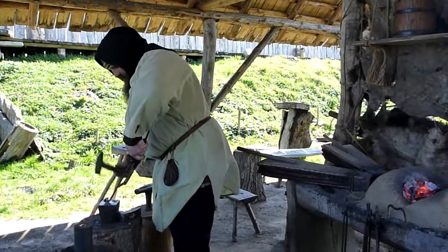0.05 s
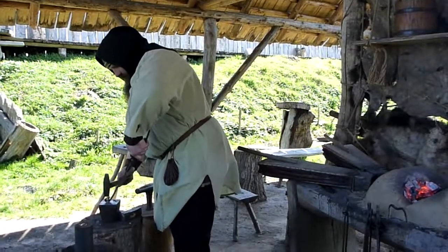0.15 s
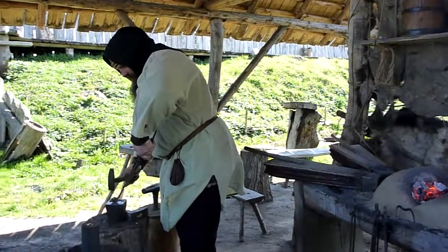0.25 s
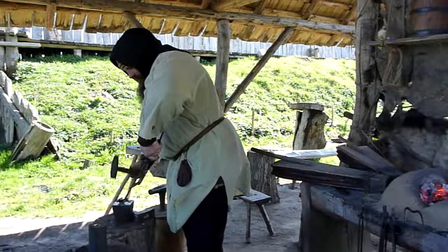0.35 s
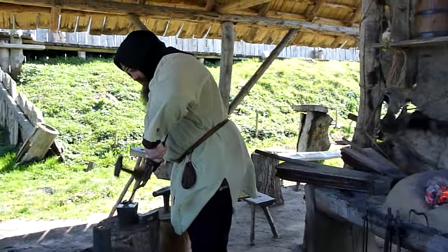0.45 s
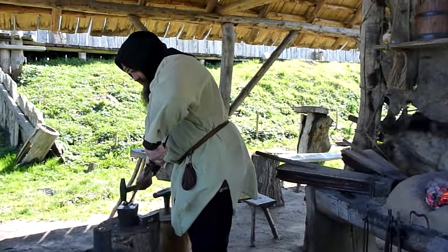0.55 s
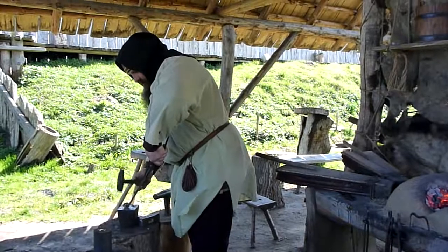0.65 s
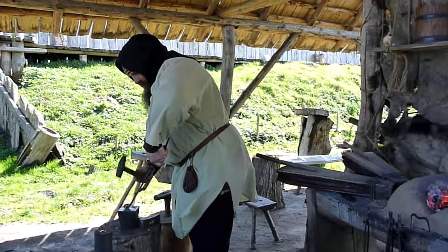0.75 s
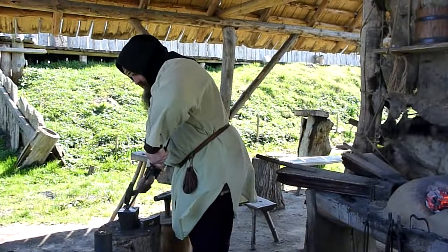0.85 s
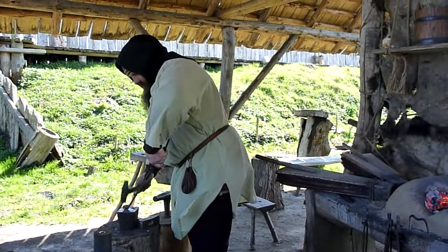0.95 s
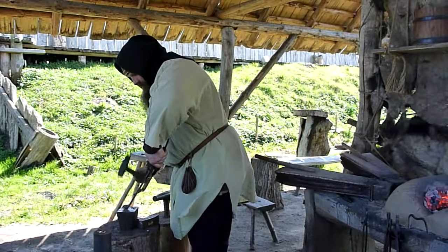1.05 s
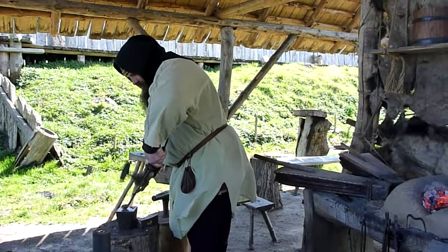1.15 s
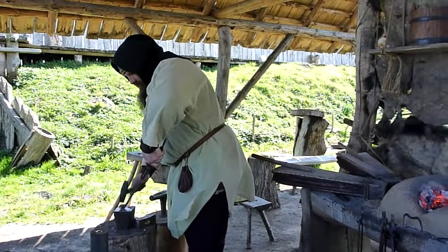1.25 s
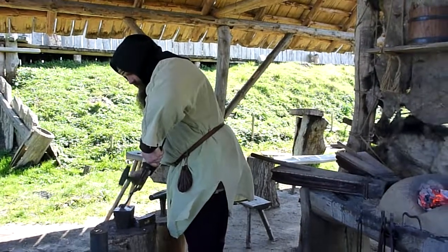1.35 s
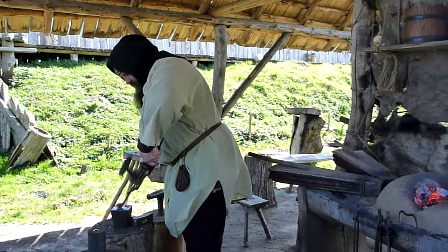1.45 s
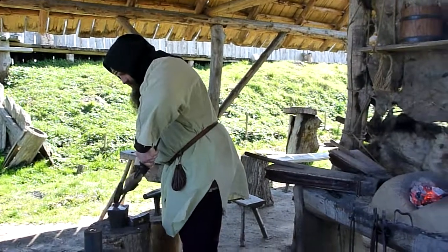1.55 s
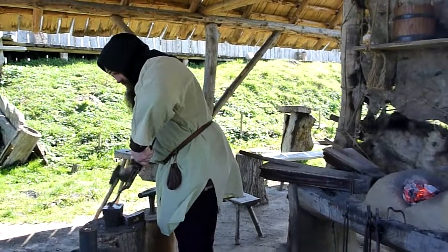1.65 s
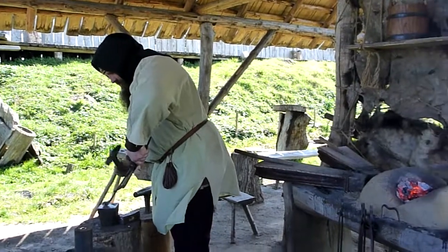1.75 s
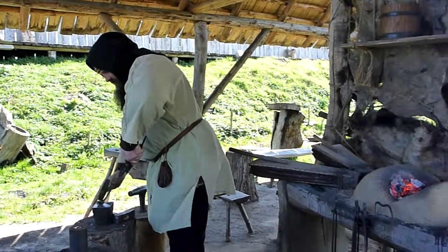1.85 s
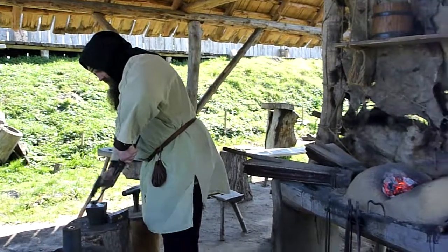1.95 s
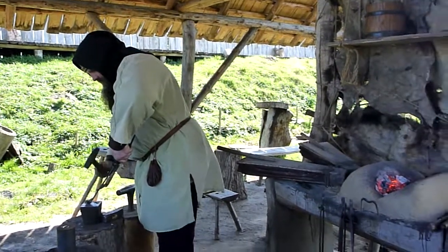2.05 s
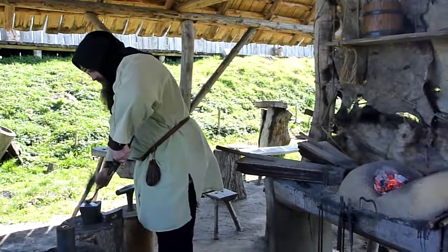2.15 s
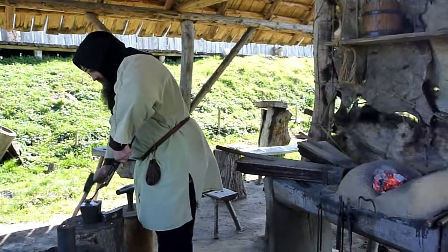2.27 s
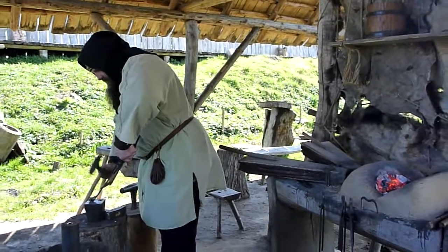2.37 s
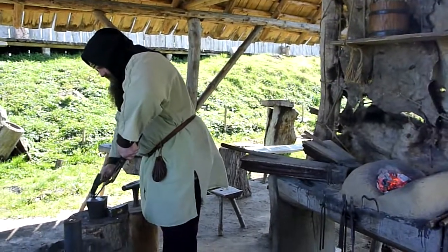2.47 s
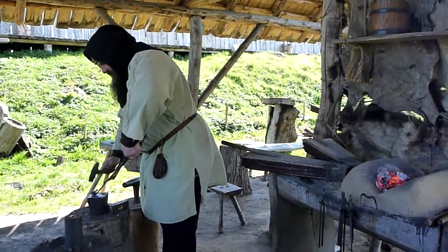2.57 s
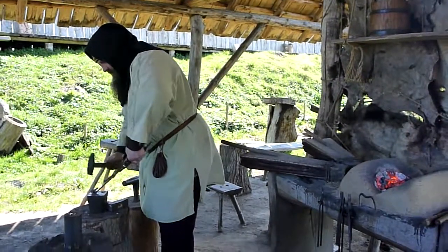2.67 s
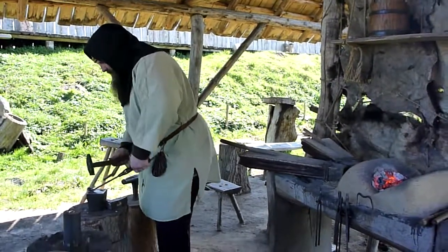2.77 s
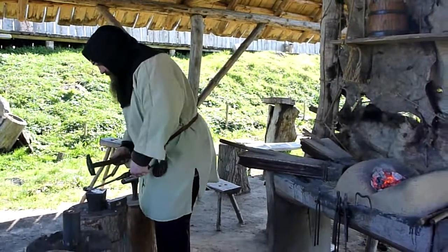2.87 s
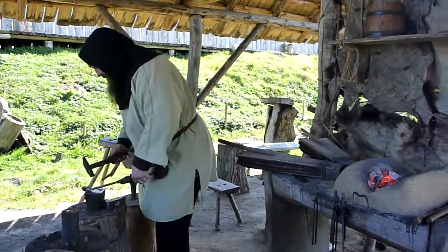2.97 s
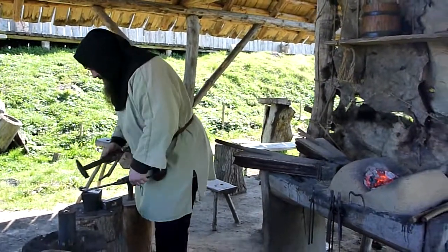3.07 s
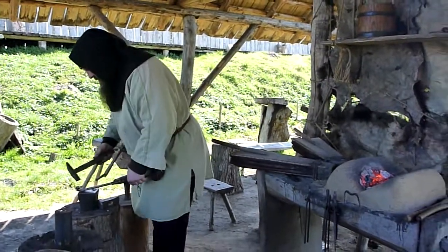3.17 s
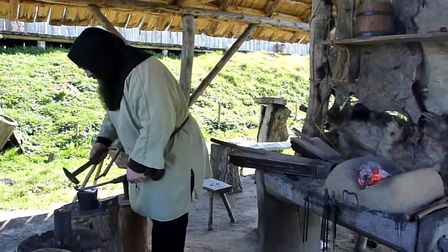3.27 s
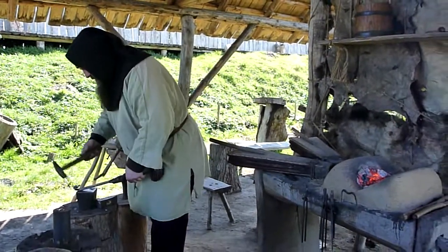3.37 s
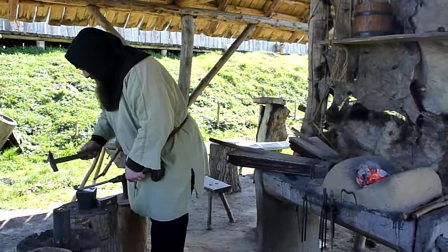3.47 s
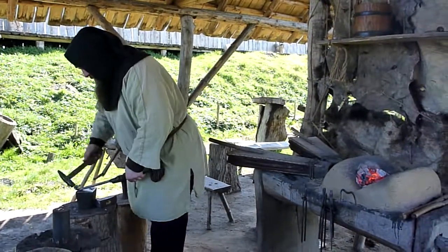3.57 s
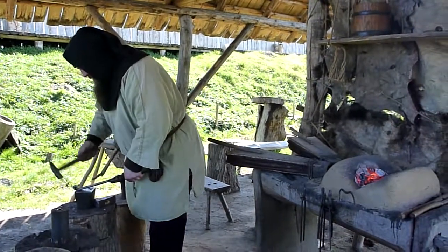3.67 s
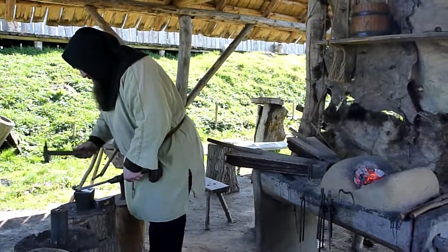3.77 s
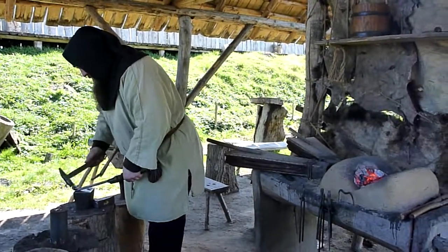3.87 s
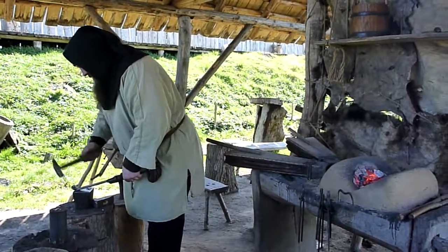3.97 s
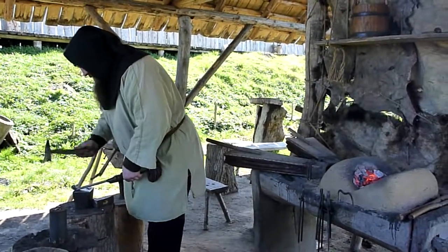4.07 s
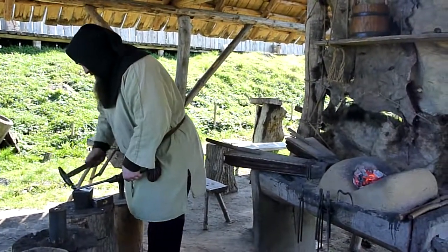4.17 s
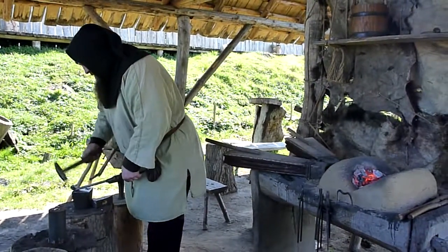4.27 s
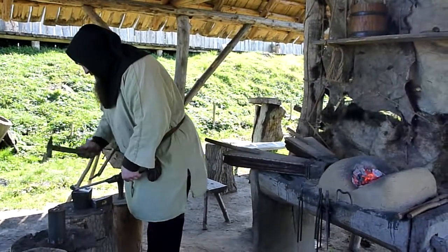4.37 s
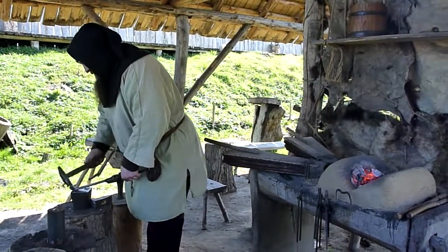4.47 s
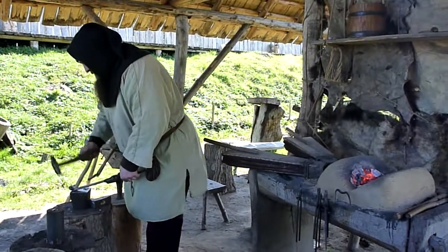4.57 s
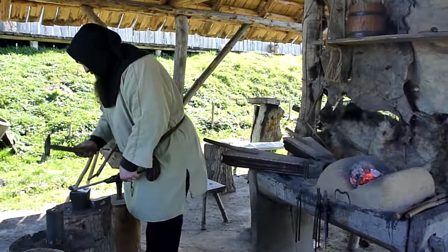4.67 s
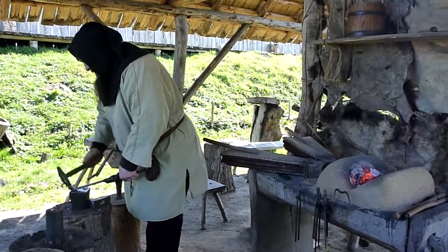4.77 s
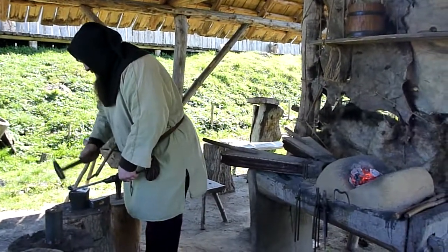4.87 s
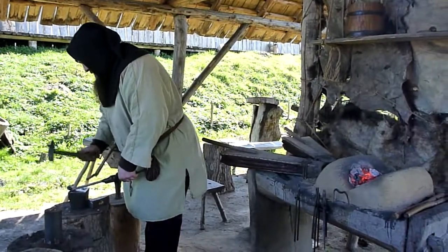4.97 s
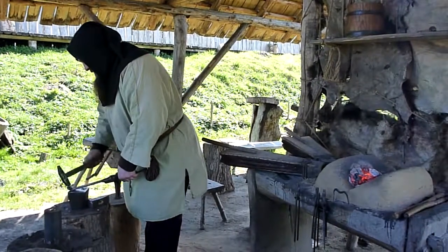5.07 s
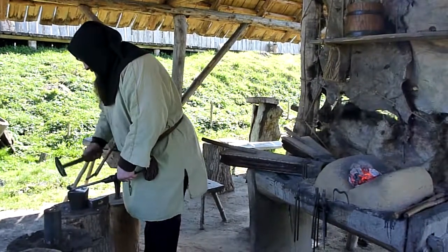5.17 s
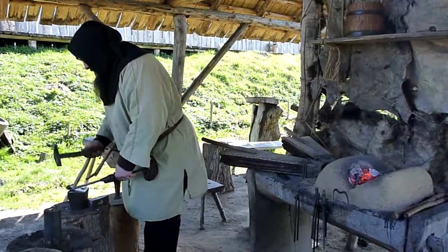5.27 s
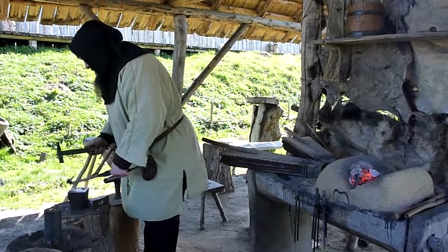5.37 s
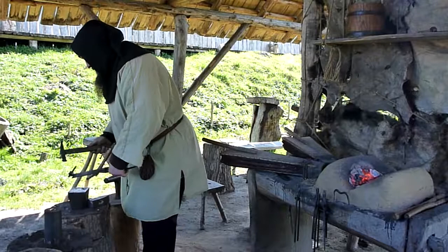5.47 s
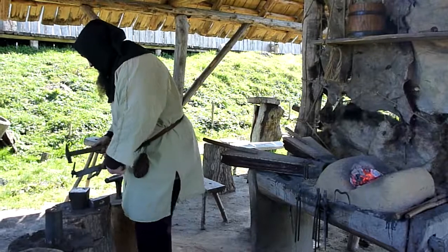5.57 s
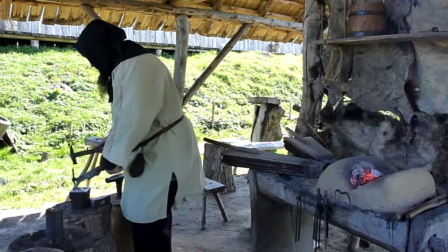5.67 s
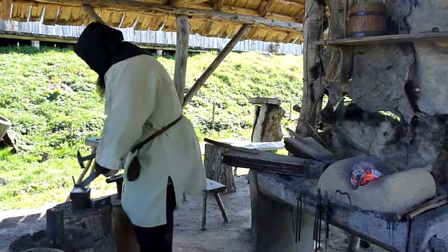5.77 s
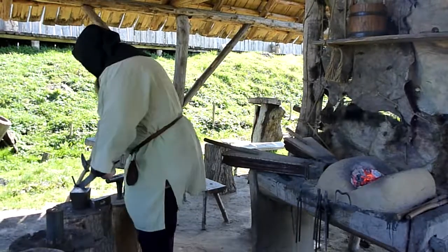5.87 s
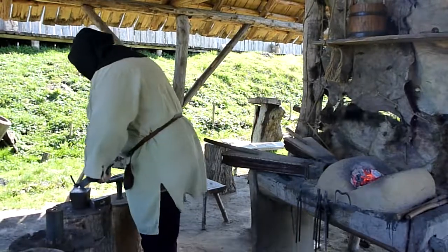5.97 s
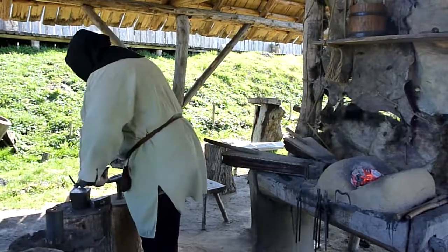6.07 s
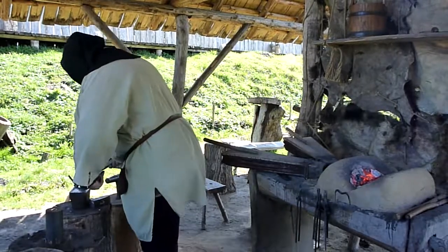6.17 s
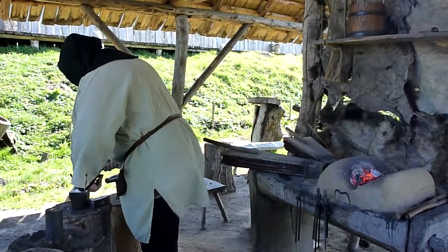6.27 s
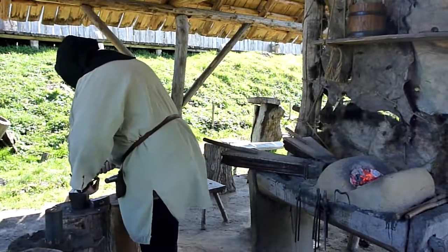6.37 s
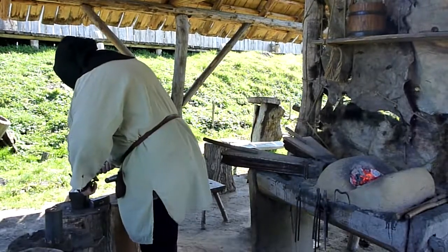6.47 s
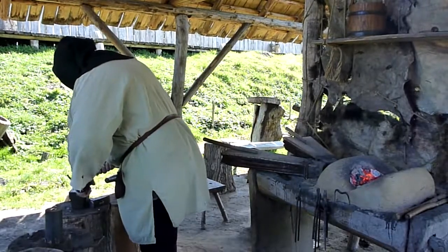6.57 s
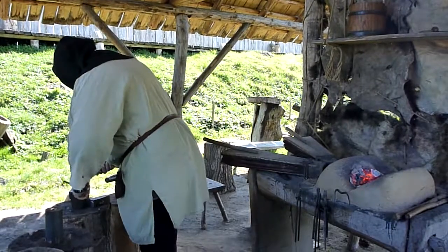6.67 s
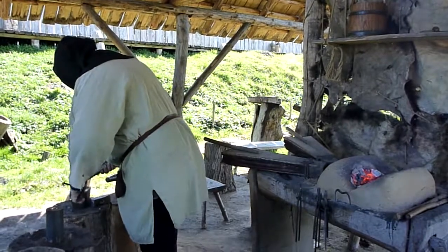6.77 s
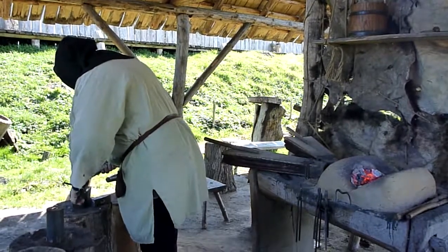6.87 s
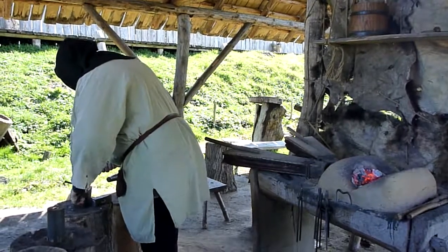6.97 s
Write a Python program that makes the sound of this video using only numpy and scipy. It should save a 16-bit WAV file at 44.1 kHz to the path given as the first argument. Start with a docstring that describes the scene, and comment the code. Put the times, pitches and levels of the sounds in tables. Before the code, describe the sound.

In an open thatched forge, a smith hammers soft iron: eight steady clanks, the first ringing slightly through the tongs, with loud dry snaps close to the microphone. He pauses, feet and clothes shifting softly, then gives six more quick blows with a tiny hammer bounce after the first. A faint tap and light rubbing follow, leaving quiet open air in mono.

```python
"""Forging on a small anvil

A smith forges hot iron on a small anvil set in a wooden stump, under an open thatched roof.
Soft iron damps each blow: noise bands decay as a short bright clack, damped modes ring as stump, anvil and tongs.
He pauses to turn the work, shifts his feet and lays the hammer down; shaped noise makes the feet, clothes and rubbing.
Dry snaps sound close by, as noise bursts with a faint ring. Filtered noise forms the outdoor air and a high squeal."""
import sys
import numpy as np
from scipy import signal
from scipy.fft import rfft, irfft
from scipy.io import wavfile

SR = 44100
rng = np.random.default_rng(int(sys.argv[2]) if len(sys.argv) > 2 else 0)


def log_audio(samples):
    """Write samples as a 16-bit WAV file to the path given in sys.argv[1]."""
    # one column per channel
    frames = np.atleast_2d(samples).T
    # limit to full scale, then quantise
    limited = np.clip(frames, -1, 1)
    pcm = np.round(limited * 32767).astype(np.int16)
    wavfile.write(sys.argv[1], SR, pcm)


N = 309994

# All levels are relative to the later gains of their own source, unless noted.
# Outdoor air: (frequency [Hz], spectral density [dB per Hz])
AIR_SPECTRUM = [(15, -54), (25, -28.5), (64, -15), (166, -5), (206, -2.5), (416, 0), (677, 1.5),
                (1040, -1.5), (1160, -2), (4140, -10.5), (5570, -12.5), (6740, -15), (7920, -16),
                (9840, -19), (16000, -34.5)]
# Slow course of the air: (time [s], level [dB])
AIR_LEVEL = [(0.0, -53), (0.19, -52.5), (0.58, -57), (2.94, -59), (3.37, -57), (4.93, -58.5), (5.19, -60),
             (7.03, -55.5)]
# Partials of a faint squeal that comes and goes once: (frequency [Hz], level at its height [dB])
SQUEAL_PARTIALS = [(4950, -65.5), (5800, -74), (6850, -68), (7550, -67), (9300, -70.5)]
SQUEAL_PEAK_S, SQUEAL_LENGTH_S = 4.13, 0.61

# Heavier shifts of the feet: (time [s], level [dB], length scale [s])
SHUFFLES = [(0.035, -49, 0.038), (0.147, -50.5, .045), (0.56, -47.5, 0.04), (1.799, -54.5, 0.019),
            (2.29, -59.5, 0.16), (2.646, -57.5, 0.038), (2.91, -60.5, 0.1), (3.275, -52, 0.023),
            (4.08, -52.5, 0.046), (4.283, -51.5, .041), (4.918, -56, 0.026), (5.54, -56, 0.072)]
# Colour of feet and clothes: (frequency [Hz], spectral density [dB per Hz])
SHUFFLE_SPECTRUM = [(50, -27), (105, -1.5), (170, 2.5), (340, 2.5), (520, -4.5), (800, -16), (2000, -50),
                    (8000, -52)]
# Clothes rustle softly between the shifts, for as long as the smith works
RUSTLES_PER_S, RUSTLE_DB, RUSTLE_SPREAD_DB, RUSTLE_S, WORK_ENDS_S = 4.2, -62, 4.5, 0.074, 5.6
# Faint rubbing of iron on iron: (time [s], level [dB], length scale [s])
RUBS = [(.295, -50.5, 0.078), (1.02, -65, 0.15), (6.48, -63.5, 0.18)]
# Colour of the rubbing: (frequency [Hz], spectral density [dB per Hz])
RUB_SPECTRUM = [(500, -21), (3000, -8), (5200, 3), (6600, 3), (9000, -25), (12000, -11), (16000, -45)]

# Dry snaps and ticks: (time [s], level [dB], main decay T60 [s], lower edge [Hz], upper edge [Hz])
SNAPS = [(0.222, -27, 0.02, 930, 1300), (.259, -24.5, 0.014, 1340, 1600),
         (0.3014, -18, 0.0032, 5030, 12000), (0.349, -24, 0.051, 1800, 10000),
         (0.3503, -6, 0.0021, 1530, 11100), (0.359, -15, 0.018, 200, 13900),
         (0.6224, -7, 0.005, 470, 10900)]
# Colour of a snap before its band limits: (frequency [Hz], spectral density [dB per Hz])
SNAP_SPECTRUM = [(40, -41), (150, 5.5), (400, 12.5), (1200, 3), (2400, 6), (3500, 9), (5800, 14),
                 (9000, -5), (12000, 0), (16000, -59)]
# Metal that the snaps set ringing: (frequency [Hz], level [dB], T60 [s])
SNAP_MODES = [(1820, 14.5, 0.043), (2410, -1, 0.23), (3320, 4, 0.12), (4440, -17, 0.13), (6900, -12, 0.11),
              (9250, -7, 0.12), (10300, -6, 0.16)]
SNAP_RING_DB = -41.5

# Clinks of the tongs on the anvil: (time [s], level [dB])
CLINKS = [(0.2802, -39), (0.29, -43), (0.606, -30), (0.6255, -43)]
CLINK_BAND_HZ = (4042, 4190)
# Modes of the tongs before extra damping: (frequency [Hz], level [dB], T60 [s])
TONGS_MODES = [(3327, -12, .16), (3908, -1, .23), (4005, -5, .28), (5545, -18, .23), (6794, -19, .2),
               (10370, -6, .23), (10620, -12, .3), (11680, -18, .13)]
# Play in the grip, loose at first and then tight: (time [s], ring of the tongs [dB])
GRIP_PLAY = [(0.11, 1), (0.5, -9), (0.83, 3.5), (1.164, -4.5), (1.49, -40)]
# A tight grip also shortens the clack: factors on its decay times
TIGHT_LENGTH, LOOSE_LENGTH = 0.82, 0.97

# Hammer blows; the thud tends to grow as the iron is beaten flat, and starts low again once it is turned:
# (time [s], level [dB], thud [dB], sizzle [dB], iron pitch [Hz], iron resonance [dB])
BLOWS = [(0.107, -22.5, -5, 4, 1980, 2.5), (0.4994, -22.5, -4.5, 0, 3240, 9.5),
         (0.831, -25, -2.5, 2, 3300, 5), (1.164, -23, -1, 1.5, 2130, 2), (1.4921, -22.5, 2.5, 5, 3380, 2.5),
         (1.8329, -22.5, 3.5, 2, 1560, 5), (2.1404, -22, 0.5, -2, 3130, 7.5),
         (2.4133, -26, 6.5, 1, 3520, 8), (3.5248, -22, -5, 1, 2120, 11.5), (3.8453, -23.5, 0, -2, 3620, -4),
         (4.1496, -25.5, 5, 3.5, 3050, 6.5), (4.445, -24, 7.5, -1, 3180, 8),
         (4.7394, -26, 10.5, 5.5, 3590, 7.5), (5.023, -25, 5, 9, 3050, 10)]
# Light taps; the hammer bounces twice, and at the end is laid down:
# (time [s], level [dB], thud [dB], sizzle [dB], length factor, iron pitch [Hz], iron resonance [dB])
TAPS = [(3.6505, -39.5, -16, -6, 0.17, 5000, 2), (3.671, -54, -20, -16, 0.46, 5000, 10),
        (5.716, -53, 17, -38, 0.65, 2340, 13.5)]
# Centres of the regions of the spectrum that a blow colours
THUD_HZ, KNOCK_HZ, CLANK_HZ, CLACK_HZ, SIZZLE_HZ = 427, 1060, 2260, (3740, 6700), 10000
# A squarer blow also clanks more: level at zero thud, and rise per dB of thud
CLANK_DB, CLANK_FOLLOWS = -5.5, 0.47
# Each face of the work knocks in its own way: (pitch [Hz], level at zero thud [dB], dB per dB of thud)
FIRST_FACE, SECOND_FACE = (1104, 0.67, 0.79), (846, -0.26, 0.63)
TURN_S = 3.0  # the work is turned over in the pause

# Dense, quickly damped vibration of hammer, iron and anvil: (frequency [Hz], spectral density [dB per Hz])
CLACK_SPECTRUM = [(40, -46), (110, -26.5), (210, -27.5), (400, -6), (620, 0), (1000, -4), (1650, -4.5),
                  (2450, -1), (3200, 1), (4300, 0), (5800, 3), (10200, -10), (12500, -18.5), (15500, -52)]
# Its decay before the length factor: (frequency [Hz], T60 [s])
CLACK_T60 = [(150, 0.13), (700, 0.28), (1800, 0.17), (4500, 0.14), (10000, 0.15), (15000, 0.052)]
# Decay of the shed before the length factor: (frequency [Hz], T60 [s])
SHED_T60 = [(150, 1), (700, 0.54), (2000, 0.41), (5500, 0.39), (12000, 0.055)]
# Modes of the stump: (frequency [Hz], level [dB], T60 [s])
STUMP_MODES = [(184, -35, 0.23), (270.2, -17.5, 0.15), (394.3, -4, 0.052), (438, -6, 0.073),
               (565.3, -3.5, 0.085), (640, -14.5, 0.15), (710, -40, 0.39), (909, -11.5, 0.15),
               (935, -6, 0.044), (981, -0.5, 0.057), (1272, -12.5, 0.13)]
# Modes of the anvil: (frequency [Hz], level [dB], T60 [s])
ANVIL_MODES = [(2027, -8.5, 0.082), (2260, -29, 0.13), (2250, -18, 0.18), (3204, -7.5, 0.13),
               (3150, -13, 0.13), (3636, -1, 0.078), (3850, -23, 0.14), (4930, -25, 0.15), (4990, 2, 0.047),
               (5280, -8, 0.13), (6140, -28, .14), (6960, -8, 0.17), (7713, 0.5, 0.12)]
ANVIL_RING_DB, TAP_RING_DB = -4.5, -4  # the anvil under full blows and under taps
# Echoes from roof and wall: (delay [s], level [dB])
ECHOES = [(.0138, -8), (.114, -38)]
CUTOFF_HZ = 16600


def from_db(db):
    """Convert a level to an amplitude ratio."""
    return 10 ** (np.asarray(db) / 20)


def rms_one(x):
    """Normalize the effective value to 1."""
    return x / np.sqrt(np.mean(x ** 2) + 1e-20)


def at_hz(points, hz):
    """Interpolate a table linearly on a logarithmic frequency axis."""
    points = np.array(points)
    return np.interp(np.log(np.maximum(hz, 1)), np.log(points[:, 0]), points[:, 1])


def add(out, s, sound):
    """Superpose a sound at a given time."""
    i = max(round(s * SR), 0)
    out[i:i + len(sound)] += sound[:N - i]


def butter(x, hz, kind, order=2):
    """Filter with the maximally flat Butterworth response."""
    sections = signal.butter(order, np.clip(hz, 10, SR * .45), kind, fs=SR, output="sos")
    return signal.sosfilt(sections, x)


def noise(spectrum, size):
    """Shape the flat spectrum of white noise in frequency, at rms 1."""
    white = rfft(rng.standard_normal(size))
    gain = from_db(at_hz(spectrum, np.fft.rfftfreq(size, 1 / SR)))
    return rms_one(irfft(white * gain, size))


def fade(t, t60):
    """Exponential damping: a fall of 60 dB in the time t60."""
    return np.exp(-np.log(1000) * t / t60)


def resonance(x, hz, width_hz, db):
    """A single resonance raises or lowers the band around its pitch."""
    band = signal.lfilter(*signal.iirpeak(hz, hz / width_hz, fs=SR), x)
    return x + (from_db(db) - 1) * band


def ring(modes, t, spread_db, waver=0.0, colour=((1, 0),)):
    """Modal superposition: strengths are drawn anew, and each ring may waver slowly in amplitude and phase."""
    hz, db, t60 = np.array(modes).T[:, :, None]
    strength_db = db + at_hz(colour, hz) + spread_db * rng.standard_normal(hz.shape)
    gain = from_db(strength_db) * rng.choice([-1, 1], hz.shape)
    knots = np.linspace(0, t[-1], 20)
    # random complex sway of amplitude and phase, one course per mode
    sway = np.array([np.interp(t, knots, [1, 1j] @ rng.standard_normal((2, len(knots)))) for _ in modes])
    tones = np.imag((1 + waver * sway) * np.exp(2j * np.pi * hz * t))
    return np.sum(gain * tones * fade(t, t60), axis=0)


def echoed(x):
    """Specular reflection: delayed, weaker copies follow the direct sound."""
    out = x.copy()
    for s, db in ECHOES:
        lag = max(round(s * SR), 1)
        out[lag:] += from_db(db) * x[:-lag]
    return out


def strokes(rows, spectrum, rise):
    """Sliding friction: many tiny random contacts sum to noise that swells and dies away."""
    out, t = np.zeros(N), np.arange(SR // 2) / SR
    for s, db, length in rows:
        age = t / max(length, .005)
        swell = age ** abs(rise) * np.exp(-2 * age ** 2)
        rubbing = rms_one(noise(spectrum, len(t)) * swell)
        add(out, s, from_db(db) * rubbing * np.sqrt(abs(length) / t[-1]))
    return out


def air(low_db=-2.5, high_db=-6.5, split_hz=2200):
    """Broadband background: a hush of filtered noise whose level drifts slowly."""
    hush = noise(AIR_SPECTRUM, N)
    lows = from_db(low_db) * rms_one(butter(hush, split_hz, "low", order=3))
    highs = from_db(high_db) * rms_one(butter(hush, split_hz, "high", order=3))
    level_db = np.interp(np.arange(N) / SR, *np.transpose(AIR_LEVEL))
    return from_db(level_db) * (lows + highs)


def squeal(width_hz=70):
    """Narrow-band noise: sharp resonances turn it into unsteady whistles that swell together."""
    age = np.clip((np.arange(N) / SR - SQUEAL_PEAK_S) / SQUEAL_LENGTH_S, -.5, .5)
    white = rng.standard_normal(N)
    whistles = 0
    for hz, db in SQUEAL_PARTIALS:
        whistle = signal.lfilter(*signal.iirpeak(hz, hz / width_hz, fs=SR), white)
        whistles = whistles + from_db(db) * rms_one(whistle)
    return whistles * np.cos(np.pi * age) ** 2


def movement():
    """Friction at loose intervals: the smith shifts his feet and his clothes rustle."""
    rustles = []
    for slot in np.arange(0, WORK_ENDS_S, 1 / RUSTLES_PER_S):
        late, loud = rng.uniform(-1.1, 1, 2)
        s = slot + .5 * (1 + late) / RUSTLES_PER_S
        rustles.append((s, RUSTLE_DB + RUSTLE_SPREAD_DB * loud, RUSTLE_S))
    return strokes(SHUFFLES + rustles, SHUFFLE_SPECTRUM, rise=0.25)


def rubbing():
    """Friction of iron on iron, heard as faint bright noise."""
    return strokes(RUBS, RUB_SPECTRUM, rise=0.55)


def snaps(tail_db=-38, tail_t60=0.072):
    """Impulsive excitation: dry noise bursts that leave a faint metallic ring."""
    out, t = np.zeros(N), np.arange(SR // 4) / SR
    for s, db, t60, low_hz, high_hz in SNAPS:
        shape = fade(t, t60) + from_db(tail_db) * fade(t, tail_t60)
        crack = rms_one(noise(SNAP_SPECTRUM, len(t)) * shape) * np.sqrt(np.mean(shape ** 2))
        crack = butter(butter(crack, low_hz, "high", order=1), high_hz, "low")
        metal = from_db(SNAP_RING_DB) * ring(SNAP_MODES, t, spread_db=2.0)
        add(out, s, from_db(db) * (crack + metal))
    return out


def clinks(lift_db=6.0, damping_t60=0.45):
    """Selective excitation: a soft touch of the tongs favours the modes near one narrow band."""
    out, t = np.zeros(N), np.arange(SR // 2) / SR
    for s, db in CLINKS:
        touch = ring(TONGS_MODES, t, spread_db=1.5) * fade(t, damping_t60)
        add(out, s, from_db(db + lift_db) * butter(touch, CLINK_BAND_HZ, "band", order=1))
    return out


def face_at(s):
    """Boundary condition: the face of the work that lies uppermost."""
    return FIRST_FACE if s < TURN_S else SECOND_FACE


def clack(t, colour, length, family, alike=0.16, crack_db=3.0, crack_t60=0.027, shed_db=-19, level_db=-8.5):
    """High modal density: damped noise in third-octave bands, as a crack, a fast decay and the shed's tail."""
    # alike is the share of noise power common to all blows
    white = np.sqrt(alike) * family + np.sqrt(1 - alike) * rng.standard_normal(family.shape)
    edges = np.geomspace(32, 16384, 28)
    out = 0
    for k, (low, high) in enumerate(zip(edges, edges[1:])):
        hz = np.sqrt(low * high)
        crack = from_db(crack_db) * fade(t, crack_t60)
        body = fade(t, length * at_hz(CLACK_T60, hz))
        tail = from_db(shed_db) * fade(t, length * at_hz(SHED_T60, hz))
        # neighbouring bands take turns between two independent noises
        band = rms_one(butter(white[k % 2] * (crack + body + tail), [low, high], "band"))
        density = from_db(at_hz(CLACK_SPECTRUM, hz) + at_hz(colour, hz))
        out = out + band * np.sqrt((high - low) / len(t)) * density
    return from_db(level_db) * out


def strike(family, face, thud_db, sizzle_db, length, anvil_db,
           stump_db=-6.0, stump_low_hz=170, onset_t60=0.0067):
    """Impact between bodies: one contact excites the iron's clack and the ring of stump and anvil."""
    t = np.arange(family.shape[1]) / SR
    _, knock_db, knock_follows = face
    colour = [(THUD_HZ, thud_db), (KNOCK_HZ, knock_db + knock_follows * thud_db),
              (CLANK_HZ, CLANK_DB + CLANK_FOLLOWS * thud_db),
              (CLACK_HZ[0], 0), (CLACK_HZ[1], 0), (SIZZLE_HZ, sizzle_db)]
    # clack and anvil start with a very short rise
    onset = 1 - fade(t, onset_t60)
    iron = echoed(onset * clack(t, colour, length, family))
    # the stump rings without deep bass
    stump = ring(STUMP_MODES, t, spread_db=4.5, waver=0.27, colour=colour)
    stump = from_db(stump_db) * butter(stump, stump_low_hz, "high", order=3)
    anvil = from_db(anvil_db) * onset * ring(ANVIL_MODES, t, spread_db=2.5, waver=0.53)
    return iron, stump + anvil


def hammer(tongs_db=-5.5, tongs_treble_db=4.0, knock_db=3.0, knock_width_hz=130,
           iron_width_hz=230, tap_width_hz=500, grip_t60=0.42):
    """Coupled vibration: blows and taps shake the same bodies, and a squarer blow drives the stump harder."""
    out, t = np.zeros(N), np.arange(SR // 2) / SR
    family = rng.standard_normal((2, len(t)))  # fine pattern of modes that all blows share
    tongs_colour = [(CLACK_HZ[1], 0), (SIZZLE_HZ, tongs_treble_db)]
    for s, db, thud, sizzle, iron_hz, iron_db in BLOWS:
        face = face_at(s)
        play = from_db(np.interp(s, *np.transpose(GRIP_PLAY)))
        length = np.interp(play, [0, .5], [TIGHT_LENGTH, LOOSE_LENGTH])
        iron, support = strike(family, face, thud, sizzle, length, ANVIL_RING_DB)
        # the way the iron lies on the anvil sets two damped resonances
        iron = resonance(iron, face[0], knock_width_hz, knock_db)
        iron = resonance(iron, iron_hz, iron_width_hz, iron_db)
        # the tongs pick up their ring gradually from the piece they hold
        tongs = ring(TONGS_MODES, t, spread_db=1.5, waver=0.83, colour=tongs_colour)
        tongs *= from_db(tongs_db) * play * (1 - fade(t, grip_t60))
        add(out, s, from_db(db) * (iron + support + tongs))
    for s, db, thud, sizzle, length, tap_hz, tap_db in TAPS:
        iron, support = strike(family, face_at(s), thud, sizzle, length, TAP_RING_DB)
        iron = resonance(iron, tap_hz, tap_width_hz, tap_db)
        add(out, s, from_db(db) * (iron + support))
    return out


def scene():
    """Linear superposition of all sources of the forge, in one channel."""
    background = air() + squeal() + movement()
    work = rubbing() + snaps() + clinks() + hammer()
    return (background + work)[None]


def record(dry, notch_hz=7950, notch_width_hz=1250, notch_floor_db=-21):
    """Linear filtering: the microphone has a deep notch in the treble, and the top is cut."""
    q = notch_hz / notch_width_hz
    notched = signal.lfilter(*signal.iirnotch(notch_hz, q, fs=SR), dry)
    # a second notch, half as wide
    notched = signal.lfilter(*signal.iirnotch(notch_hz, 2 * q, fs=SR), notched)
    heard = notched + from_db(notch_floor_db) * dry
    return signal.sosfilt(signal.cheby2(10, 50, CUTOFF_HZ, fs=SR, output="sos"), heard)


dry = scene()
out = record(dry)
log_audio(out)
```